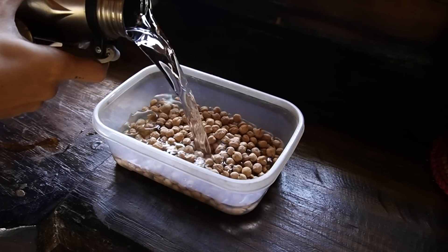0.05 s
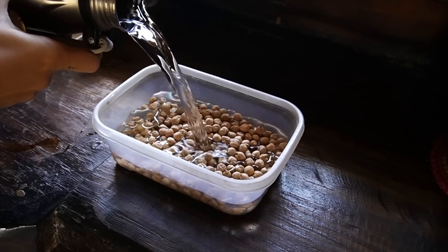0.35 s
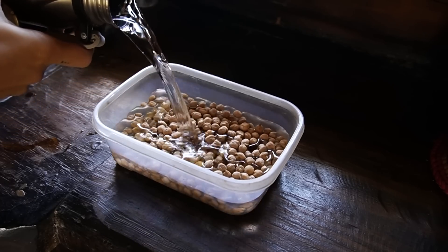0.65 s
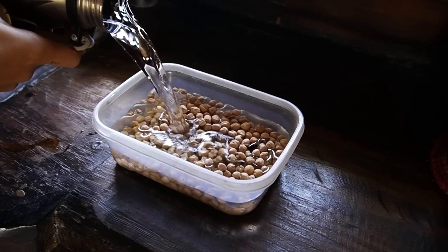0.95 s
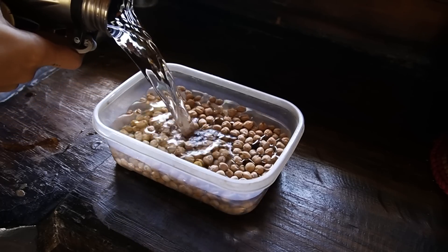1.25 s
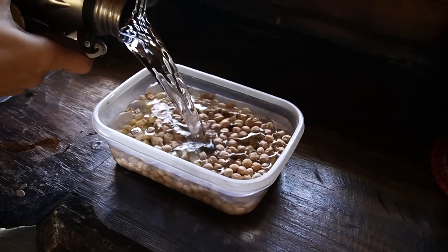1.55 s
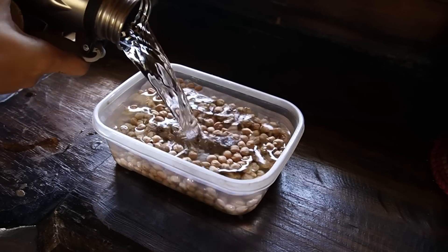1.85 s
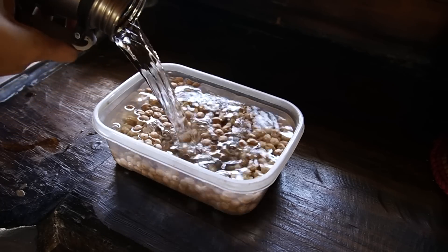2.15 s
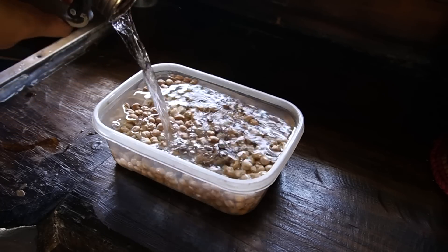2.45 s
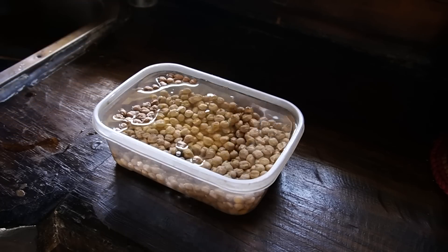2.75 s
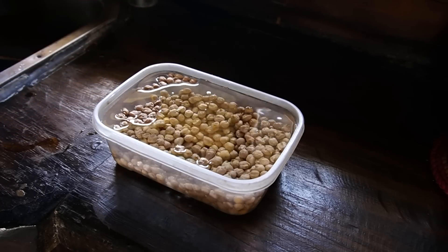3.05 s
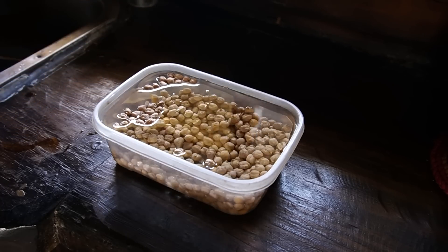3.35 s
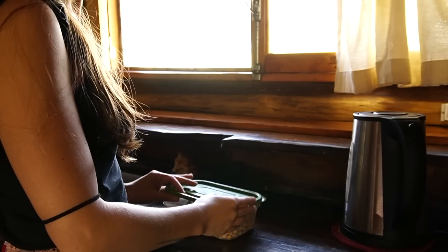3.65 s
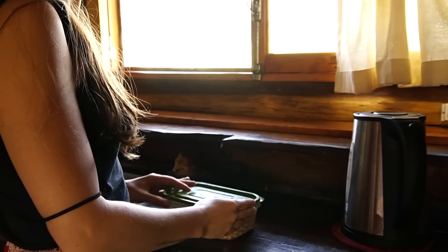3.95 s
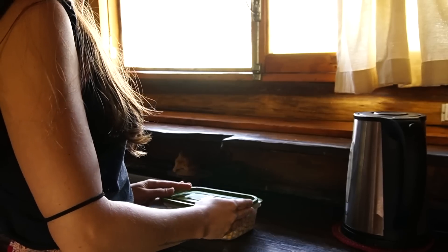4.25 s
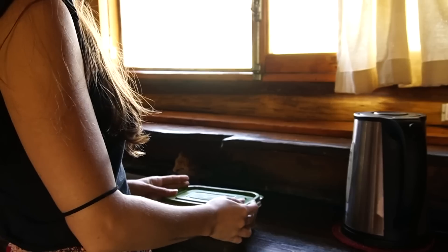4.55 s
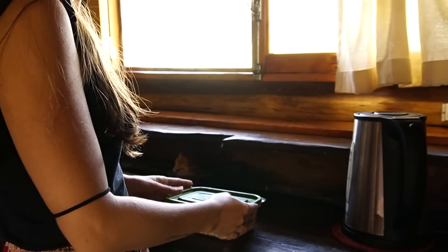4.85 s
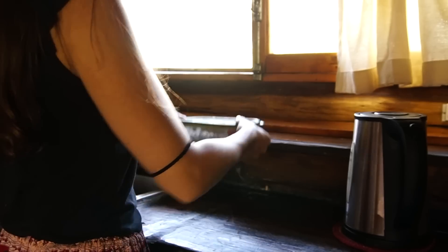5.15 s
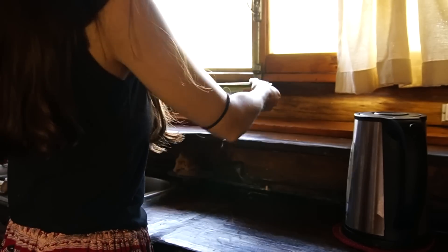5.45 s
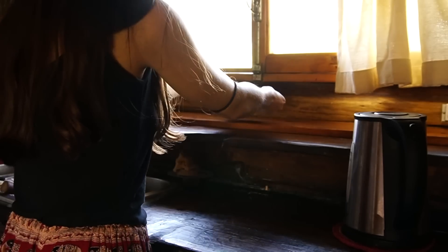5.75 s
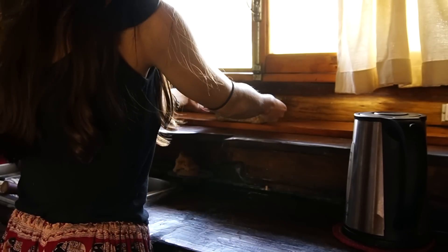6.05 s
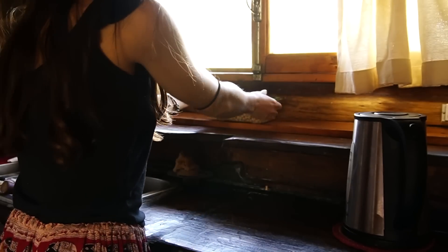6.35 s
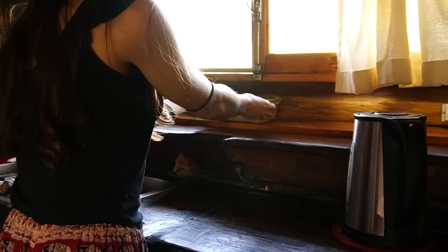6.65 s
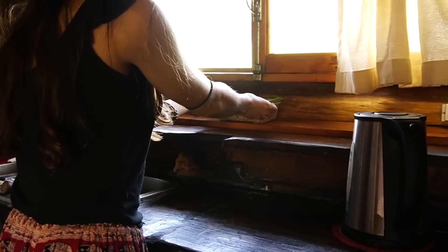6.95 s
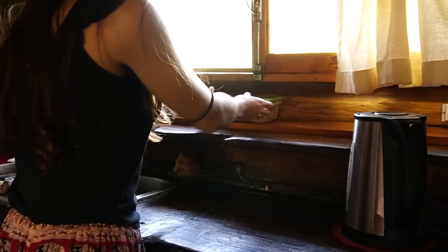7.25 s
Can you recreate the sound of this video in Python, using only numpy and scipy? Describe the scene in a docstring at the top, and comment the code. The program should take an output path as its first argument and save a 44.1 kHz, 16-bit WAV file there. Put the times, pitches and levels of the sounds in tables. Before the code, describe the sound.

In a small wooden kitchen, a stream of water splashes over dried chickpeas in a plastic tub, near and slightly to the right, growing fuller and bubblier before trickling out. A steel flask is set down with a short ringing clatter, then a lid clicks shut three times. Last comes the more distant knock of the tub on a shelf, over a soft fridge hum and faint dripping.

```python
"""Water patters onto dried chickpeas in a plastic tub, close to a pair of microphones, slightly right.
Poured from a steel flask, it swells into a bubbling gurgle as the peas go under, then thins and stops.
The flask is set down with a clank, a lid is pressed on until its edges snap, and the tub knocks onto
a wooden shelf farther off. The place is a small wooden kitchen: after the pour a fridge hums,
and something, perhaps a tap, drips faintly in the distance."""
import sys
import numpy as np
from scipy import signal
from scipy.fft import rfft, irfft
from scipy.io import wavfile
from scipy.ndimage import uniform_filter1d

SR = 44100
rng = np.random.default_rng(int(sys.argv[2]) if len(sys.argv) > 2 else 0)


def bounce(signal):
    """Save signal as a 16-bit WAV file at the path given by the first command-line argument."""
    frames = np.transpose(np.atleast_2d(signal))
    limited = np.clip(frames, -1, 1)
    pcm = np.round(limited * 32767).astype(np.int16)
    wavfile.write(sys.argv[1], SR, pcm)


N = 322363
TIME = np.arange(N) / SR
TAPS, TOP_HZ = 4096, 15850
HZ = np.fft.rfftfreq(TAPS, 1 / SR)
COVER_START_S, COVER_LENGTH_S = 0.8, 0.6  # the water closes over the peas


# splash colour on bare peas, in deep water and as the stream thins: frequency_hz, level_db
ON_PEAS = [(290, -61), (500, -32), (850, -22.5), (1070, -7), (1560, -11), (1850, -6), (2330, -10),
           (4440, -7), (5830, -18), (8480, -27.5), (15500, -58.5)]
IN_WATER = [(240, -53), (400, -18), (466, -34), (683, -19), (1100, -6), (1630, -5.5), (1790, -0.5),
            (2710, -7), (3410, -1), (4420, -4.5), (8150, -23), (11500, -31.5), (15500, -59)]
THINNING = [(500, -61), (666, -17), (941, -4), (1820, -8.5), (2330, -12), (3430, -6.5), (6500, -12.5),
            (9650, -20.5), (15500, -28)]
def stream(tub_hz=1800, tub_width_hz=140, tub_db=-41):
    """Close up, tiny bubbles crackle and make the tub sing; larger ones grow as the peas go under."""
    covered = ramp(COVER_START_S, COVER_LENGTH_S)
    thin = ramp(start_s=2.435, length_s=0.34)  # the flask tips back
    crackle = froth(503, 11560, cycles=0.82, rise=0.029, spread_db=1, clump_db=4, count=9000)
    gurgle = froth(737.6, 3108, cycles=7.1, rise=0.0053, spread_db=3, clump_db=3.5, count=1900)
    chime = froth(1150, 4800, cycles=10, rise=0.003, spread_db=1, clump_db=1.5, count=420)
    swarm = unit_rms(crackle) + gain_of(-5) * (1 + covered) / 2 * unit_rms(gurgle)
    swarm += gain_of(-10) * unit_rms(chime)
    stages = ((1 - covered, ON_PEAS), (covered - thin, IN_WATER), (thin, THINNING))
    splash = sum(share * unit_rms(colour(swarm, curve(tone))) for share, tone in stages)
    tub = signal.lfilter(*signal.iirpeak(tub_hz, tub_hz / tub_width_hz, fs=SR), crackle)
    tub_gain = gain_of(tub_db) * ramp(0, 0.1) * (1 - thin)
    return gain_of(-1.2) * poured(splash, flow()) + poured(tub, tub_gain)


# strength of the stream: time_s, level_db
FLOW = [(0.0, -38.5), (0.17, -32.5), (0.3, -28.5), (0.55, -34.5), (0.92, -30.5), (1.0, -21), (1.19, -18),
        (1.62, -16.5), (1.7, -20), (1.82, -17), (2.07, -19), (2.19, -16), (2.26, -19), (2.3, -22.5),
        (2.43, -27.5), (2.69, -30.5), (2.756, -35)]
POUR_END_S = FLOW[-1][0]
# separate spurts, later surges of the full stream: start_s, length_s, level_db, spray_db
SPURTS = [(0.177, 0.1, -27.5, -38), (0.344, 0.069, -23, -33.5), (0.587, 0.1, -24.5, -59),
          (0.754, 0.13, -22, -49), (1.13, 0.04, -21.5, -25.5), (1.211, 0.022, -23, -28),
          (2.108, 0.033, -17, -37)]
def flow():
    """Gain of the water landing in the tub: it builds in spurts, runs full and thins out."""
    steady = gain_of(np.interp(TIME, *np.transpose(FLOW)))
    spurt_power = sum((gain_of(db) * spurt(s, length_s)) ** 2 for s, length_s, db, _ in SPURTS)
    return np.sqrt(steady ** 2 + spurt_power)


def spray(on_peas_db=-18, in_water_db=-23):
    """Fine spray hisses and sparkles with each spurt; bare peas throw up more than water does."""
    mist = froth(4000, 12600, cycles=3.3, rise=0.018, spread_db=3.5, clump_db=4.5, count=2600)
    pips = froth(5500, 11000, cycles=13, rise=0.012, spread_db=2, clump_db=1.5, count=140)
    hiss = colour(unit_rms(mist) + unit_rms(pips), curve([(2500, -42), (4400, 7.5), (14000, -29)]))
    covered = ramp(COVER_START_S, COVER_LENGTH_S)
    steady = flow() * gain_of(on_peas_db + (in_water_db - on_peas_db) * covered)
    bursts = sum(gain_of(db) * spurt(s, length_s) for s, length_s, _, db in SPURTS)
    return poured(hiss, steady + bursts)


# lumps of water, and single droplets falling back: start_s, level_db, pitch_hz
GULPS = [(0.087, -15.5, 1750), (0.131, -12.5, 1720), (0.18, -11.5, 1770), (0.231, -9.5, 1820),
         (0.347, -11, 4430), (0.367, -7.5, 3130), (0.463, -6.5, 3600), (0.481, -12.5, 3260),
         (0.599, -10.5, 1260), (0.657, -9, 1660), (0.67, -8, 2070), (0.747, -10, 1350), (0.935, -8, 3030),
         (0.969, -8.5, 2430), (0.979, -3, 1850), (1.02, -4.5, 3060), (1.112, -5.5, 3830), (1.229, -4, 4690),
         (1.274, -9, 3100), (1.568, -8, 1840), (1.691, -5, 1960), (1.714, -4.5, 1810), (2.191, -6.5, 3080),
         (2.258, -6, 1940), (2.263, -7, 3370), (2.306, -7, 3620), (2.316, -4, 3550), (2.385, -4.5, 3470),
         (2.457, -11.5, 2020), (2.484, -13, 2000), (2.567, -10, 3360)]
DROPLETS = [(0.4556, -14.5, 8060), (0.598, -17.5, 8800), (0.979, -18, 7900), (1.511, -13.5, 8060),
            (2.452, -27.5, 9100), (2.6217, -20, 9600), (2.6384, -23, 8100), (2.664, -26, 7700),
            (2.692, -28, 7900)]
def gulps_and_droplets(rise=0.0079, peas_slap_s=0.0057, water_slap_s=0.0032):
    """A lump of water slaps down and leaves one large bubble ringing; stray droplets pip high above."""
    out = np.zeros(N)
    slap_colour = curve(ON_PEAS) + 3.9 * np.clip(HZ / 10000, 0, 1)
    for s, db, hz in GULPS:
        slap_s = peas_slap_s + (water_slap_s - peas_slap_s) * ramp(COVER_START_S, COVER_LENGTH_S, s)
        add(out, s, gain_of(db - 8.5) * contact(slap_s, slap_colour, crack=0.61))
        cycles = 7 * np.sqrt(hz / 3000)  # small bubbles ring for more cycles
        add(out, s, gain_of(db - 5) * bubble(hz, cycles, rise))
    for s, db, hz in DROPLETS:
        pip = colour(bubble(hz, cycles=11, rise=rise), -abs(HZ - hz) / 330)
        add(out, s, gain_of(db - 1) * pip)
    return butterworth(out, 5, (820, 13000), "band")


# clear bubble notes, most in the last trickle: start_s, level_db, pitch_hz, decay_s
PLINKS = [(0.632, -21, 1415, 0.013), (0.654, -16, 1600, 0.007), (2.484, -9.5, 1294, 0.0035),
          (2.514, -15, 1950, 0.0056), (2.529, -20, 1030, 0.0039), (2.567, -10.5, 994, 0.0037),
          (2.605, -22, 1380, 0.0045), (2.64, -24, 910, 0.011), (2.709, -23, 2140, 0.0069)]
def plinks():
    """Bubbles ring clearly and glide upwards, some ringing on from a small splash."""
    out = np.zeros(N)
    for s, db, hz, decay_s in PLINKS:
        add(out, s, gain_of(db) * bubble(hz, cycles=decay_s * hz, rise=0.012))
    return butterworth(out, 4, (760, 5000), "band")


# moments when the stream digs deep: middle_s, length_s, level_db
GURGLES = [(1.245, 0.099, -37), (1.876, 0.28, -36)]
def gurgles():
    """Big, low bubbles well up and sink away under the splashing."""
    swarm = froth(611, 814, cycles=7.3, rise=0.0036, spread_db=3.5, clump_db=3.5, count=250)
    swells = sum(gain_of(db) * swell(s, length_s) for s, length_s, db in GURGLES)
    return poured(butterworth(swarm, 3, 550, "high"), swells)


def drumming(drum_db=-52.5, full_flow_db=-18):
    """The stream buffets the floor of the tub, harder as it grows; once there is a dull bump."""
    buffets = rng.standard_normal(N) * gain_of(4 * band_noise(N, 0, 80))
    drum = colour(buffets, curve([(40, -23), (200, 4.5), (450, -4), (800, -22), (2000, -64)]))
    bump = gain_of(-39.5) * swell(middle_s=0.925, length_s=0.071)
    return poured(drum, gain_of(drum_db - full_flow_db) * flow() + bump)


def foam(start_s=2.762, level_db=-37, fade_s=0.13):
    """A soft fizz dies away in the tub when the stream stops."""
    age = TIME - start_s
    tone = curve([(400, -6), (1200, -6), (2900, 5.5), (8000, -4.5), (15000, -18)])
    fizz = unit_rms(colour(rng.standard_normal(N), tone))
    return gain_of(level_db) * fizz * (age > 0) * np.exp(-abs(age) / fade_s)


# the flask landing: start_s, level_db, decay_s, tilt_db_per_octave, lowest_hz, spot_hz, thud_db
FLASK_BLOWS = [(2.949, -26.5, 0.01, 2.5, 1200, 1640, -5), (2.977, -15, 0.0066, -4.5, 152, 534, -3),
               (2.994, -15, 0.0044, 1.5, 1090, 2080, -27), (3.000, -9.5, 0.0024, 2, 910, 2150, -36),
               (3.085, -21, 0.011, -1.5, 170, 5060, 0), (3.1145, -16, 0.0078, -1, 200, 1900, -3),
               (3.119, -18.5, 0.0089, 2, 200, 410, -4)]
# colour of its contact: frequency_hz, level_db
FLASK_COLOUR = [(88, -57), (150, -24), (787, -12), (1200, -1), (1350, -8.5), (2100, -9), (3400, -19.5),
                (4810, -12.5), (8750, -29), (9600, -25.5), (15000, -56)]
# modes of the steel: pitch_hz, level_db, t60_s
FLASK_MODES = [(1192, 4, 0.15), (1583, 7, 0.067), (1660, 3, 0.16), (2056, 11, 0.09), (2140, -4, 0.22),
               (3040, -5, 0.23), (4840, -11, 0.22)]
def flask_set_down():
    """The steel flask clatters and rings on wood, near the microphones."""
    return knocks(FLASK_BLOWS, FLASK_COLOUR, FLASK_MODES, contact_db=-3.5, ring_db=-21,
                  thud_hz=215, thud_t60_s=0.04, crack=3.2)


# edges catching: start_s, level_db, decay_s, tilt_db_per_octave, lowest_hz, spot_hz, thud_db
LID_BLOWS = [(3.6865, -5, 0.0027, 0, 900, 1030, -27.5), (3.699, -16, 0.014, -0.5, 900, 990, -35),
             (3.737, -27, 0.0074, -2, 240, 1010, -28), (4.200, -7, 0.0061, 0, 253, 2490, -12),
             (4.209, -16.5, 0.013, -5.5, 595, 1420, -13), (4.723, -16.5, 0.028, -1.5, 724, 840, -41),
             (4.732, -13, 0.01, -2.5, 710, 2330, -35), (4.745, -6, 0.0038, 0, 258, 3780, -19.5)]
# colour of a snap: frequency_hz, level_db
LID_COLOUR = [(88, -47), (150, 1), (450, -6), (742, -0.5), (1870, -5.5), (2600, -4.5), (3900, -4.5),
              (6060, -13.5), (10000, -29), (15000, -50)]
# modes of the lid and tub: pitch_hz, level_db, t60_s
LID_MODES = [(706, 5.5, 0.054), (835, 2.5, 0.096), (1400, -5, 0.12), (1712, -12, 0.1), (2300, -8, 0.067),
             (3400, 1, 0.091)]
def lid_snaps():
    """Close by, the plastic lid snaps over the rim in three presses."""
    return knocks(LID_BLOWS, LID_COLOUR, LID_MODES, contact_db=-6, ring_db=-23,
                  thud_hz=156.5, thud_t60_s=0.098, crack=5)


# fingers and plastic rubbing on the tub: middle_s, level_db, length_s, hollow_db
RUBS = [(3.917, -42, 0.088, -11), (3.953, -37.5, 0.02, -24), (4.19, -37.5, 0.049, -6.5),
        (4.46, -39, 0.074, -4), (4.521, -41, 0.057, -0.5), (4.57, -37, 0.033, 3), (4.72, -37, 0.097, -3.5),
        (6.274, -46.5, 0.079, -7), (7.173, -49.5, 0.037, 5.5)]
def rubs():
    """Small slips of skin and plastic scrape and wake the hollow of the tub."""
    out, size = np.zeros(N), SR // 4
    half_s = size / SR / 2
    tone = curve([(80, -24), (150, 7), (600, -11), (1500, 2), (4000, 0.5), (7000, -7), (15000, -33)])
    for s, db, length_s, hollow_db in RUBS:
        slips = rng.standard_normal(size) * gain_of(4 * band_noise(size, 0, 500))
        scrape = unit_rms(colour(slips, tone))
        hollow = gain_of(hollow_db) * band_noise(size, hz=790, width_hz=290)
        stroke = swell(half_s, length_s)[:size]
        add(out, s - half_s, gain_of(db) * stroke * (scrape + hollow))
    return out


# the tub landing: start_s, level_db, decay_s, tilt_db_per_octave, lowest_hz, spot_hz, thud_db
SHELF_BLOWS = [(5.924, -7, 0.0015, -3.5, 330, 2700, -25), (5.926, -12, 0.0068, -7.5, 300, 410, -17),
               (5.937, -13.5, 0.0085, -3, 330, 480, -21), (5.961, -9.5, 0.0012, -4, 300, 2600, -15),
               (5.964, -16, 0.017, -4, 332, 445, -14)]
# colour of plastic on wood: frequency_hz, level_db
SHELF_COLOUR = [(71, -57), (120, -5.5), (374, -14.5), (445, -9.5), (693, -7), (1200, -8.5), (2400, -7.5),
                (3180, -4.5), (12000, -39.5), (15600, -80)]
# modes of the tub and shelf: pitch_hz, level_db, t60_s
SHELF_MODES = [(393, -7, 0.079), (455, -10, 0.1), (593, -5, 0.23), (732, -6, 0.14), (1166, -6, 0.26)]
def tub_on_shelf():
    """Farther from the microphones, the filled tub knocks onto a wooden shelf."""
    return knocks(SHELF_BLOWS, SHELF_COLOUR, SHELF_MODES, contact_db=-7, ring_db=-28.5,
                  thud_hz=176, thud_t60_s=0.065, crack=0.87, spot_octaves=0.29)


# drips on a nearly even beat, with two gaps: start_s, level_db
DRIPS = [(4.924, -43), (5.19, -41), (5.453, -44.5), (5.719, -40), (6.253, -41), (6.78, -42.5),
         (7.044, -43.5)]
# colour of a drip: frequency_hz, level_db
DRIP_COLOUR = [(1500, -21), (3600, 0), (4600, -6), (5200, 1), (6300, -11), (15000, -26)]
def drips(rise_s=0.007, fade_s=0.017):
    """Soft ticks across the kitchen, each smeared into a short spatter."""
    out, t = np.zeros(N), TIME[:TAPS]
    envelope = 2 * (1 - np.exp(-t / rise_s)) * np.exp(-t / fade_s)
    for s, db in DRIPS:
        spatter = unit_rms(colour(rng.standard_normal(TAPS), curve(DRIP_COLOUR)))
        add(out, s - rise_s, gain_of(db) * spatter * envelope)
    return out


# colour of the room tone: frequency_hz, level_db
ROOM_TONE = [(15, -28), (25, -15), (107, -9.5), (140, -7), (313, -10.5), (380, -8.5), (684, -11.5),
             (1200, -11), (1900, -14), (3830, -15.5), (15500, -32.5)]
# bands of the fridge hum: pitch_hz, width_hz, level_db
FRIDGE_HUM = [(44, 10, -66.5), (132.3, 20, -60.5), (202, 18, -64), (1240, 49, -62)]
def fridge_and_air(fridge_on_s=3.2, air_db=-46.5, bass_while_off_db=-8):
    """Steady air all around the microphones, joined by the wavering hum and rumble of the fridge."""
    running = ramp(fridge_on_s, 0.021)
    mid, side = (unit_rms(colour(rng.standard_normal(N), curve(ROOM_TONE))) for _ in range(2))
    air = microphone_pair(mid, side)
    bass = butterworth(air, 1, 120, "low")
    air -= bass * (1 - running) * (1 - gain_of(bass_while_off_db))
    hum = sum(gain_of(db) * band_noise(N, hz, width_hz) for hz, width_hz, db in FRIDGE_HUM)
    return gain_of(air_db) * air + running * hum


# reverberation of the kitchen: frequency_hz, t60_s
KITCHEN_DECAY = [(120, 0.36), (320, 0.21), (840, 0.32), (2200, 0.28), (5800, 0.32), (14000, 0.52)]
def kitchen(direct, wet_db, delay_s=0.0044):
    """The direct sound, then reflections off close wooden walls, each band dying at its own speed."""
    size = SR // 2
    echoes = rng.standard_normal((2, size)) * (rng.random((2, size)) < .08) * (TIME[:size] > delay_s)
    hz, t, bands = signal.stft(echoes, SR, nperseg=256)
    tails = signal.istft(bands * decay(t, curve(KITCHEN_DECAY, hz)[:, None]), SR, nperseg=256)[1]
    tails = microphone_pair(*(tails / np.linalg.norm(tails, axis=1, keepdims=True)))
    return direct + gain_of(wet_db) * signal.oaconvolve(direct[None], tails, axes=1)[:, :N]


# stereo width of diffuse sound: frequency_hz, side_db
STEREO_WIDTH = [(60, -16), (250, -6.5), (900, -10), (2500, -6), (5000, -2), (9000, -0.5), (13000, -1)]
def microphone_pair(mid, side):
    """Two closely spaced microphones hear bass alike and treble differently."""
    side = colour(side, curve(STEREO_WIDTH))
    return np.array([mid + side, mid - side])


def bubble(hz, cycles, rise):
    """A trapped bubble rings, dies, and rises in pitch as it nears the surface."""
    age = np.arange(int(5 * cycles / hz * SR) + 2) * hz / (SR * cycles)  # in decay times
    return np.exp(-age) * np.sin(2 * np.pi * cycles * age * (1 + rise * age))


def froth(low_hz, high_hz, cycles, rise, spread_db, clump_db, count):
    """A clumped swarm of bubbles of many sizes, scattered over the whole pour."""
    out, clumps = np.zeros(N), band_noise(N, 0, 67)
    when, pitch, life, size, sign = rng.random((count, 5)).T
    starts_s = when * POUR_END_S
    pitches_hz = np.minimum(low_hz * (high_hz / low_hz) ** pitch, TOP_HZ)
    ring_cycles = cycles * 4 ** (life - .5)
    size_db = spread_db * np.minimum(-np.log(1 - size), 3.5)
    size_db += clump_db * np.interp(starts_s, TIME, clumps)
    heights = np.sign(sign - .5) * gain_of(size_db) * pitches_hz / np.sqrt(ring_cycles)
    for s, hz, ring, height in zip(starts_s, pitches_hz, ring_cycles, heights):
        add(out, s, height * bubble(hz, ring, rise))
    return out


def poured(x, gain):
    """Levels a sound, makes it follow a gain, and stops it with the stream."""
    power = uniform_filter1d(uniform_filter1d(x ** 2, size=2000), size=1400)
    stop = np.clip((POUR_END_S - TIME) / 0.011 + 1, 0, 1)
    return x / np.sqrt(abs(power) + 1e-4 * power.max()) * gain * stop


def knocks(blows, body, modes, contact_db, ring_db, thud_hz, thud_t60_s, crack, spot_octaves=0.19):
    """Each blow is a clatter of contact, the ringing of the thing, and a thud of the wood below."""
    out, t = np.zeros(N), TIME[:SR // 2]
    thud = decay(t, thud_t60_s) * np.sin(2 * np.pi * thud_hz * t) * (1 - np.exp(-t * thud_hz))
    for s, db, decay_s, tilt, lowest_hz, spot_hz, thud_db in blows:
        # a blow on a stiff edge leaves the low modes still, and each spot has its own note
        stiff_db = -10 * np.log10(1 + (lowest_hz / (HZ + 1)) ** 8)
        slope_db = tilt * np.log2(np.clip(HZ, 300, 9000) / 1500) + stiff_db
        spot_db = 7 * np.exp(-(np.log2((HZ + 1) / spot_hz) / spot_octaves) ** 2)
        ring = np.zeros(len(t))
        for hz, mode_db, t60_s in modes:
            shifted_hz = hz * (1 + 0.0087 * rng.normal())  # each note shifts a little from blow to blow
            note = np.sin(2 * np.pi * (shifted_hz * t + rng.random()))
            ring += gain_of(mode_db + np.interp(hz, HZ, slope_db)) * decay(t, t60_s) * note
        clatter = contact(decay_s, curve(body) + slope_db + spot_db, crack)
        add(out, s, gain_of(db + contact_db) * clatter)
        add(out, s, gain_of(db) * (gain_of(ring_db) * ring + gain_of(thud_db) * thud))
    return out


def contact(decay_s, colour_db, crack):
    """A sharp first touch of height crack, with a brief clatter of noise behind it."""
    burst = rng.standard_normal(TAPS) * np.exp(-TIME[:TAPS] / decay_s)
    burst[0] = crack
    burst = colour(burst, colour_db)
    return burst * np.sqrt(decay_s * SR / 2 / np.sum(burst ** 2))


def spurt(start_s, length_s, rise_s=0.0021, fade_s=0.0039):
    """Rises quickly, holds, and dies away."""
    return ramp(start_s, rise_s) * np.exp(-np.maximum(TIME - start_s - length_s, 0) / fade_s)


def swell(middle_s, length_s):
    """A smooth rise and fall."""
    return np.exp(-(2 * (TIME - middle_s) / length_s) ** 2)


def ramp(start_s, length_s, t=TIME):
    """Rises from 0 to 1 in a straight line."""
    return np.clip((t - start_s) / length_s, 0, 1)


def decay(t, t60_s):
    """Falls by 60 dB in t60_s."""
    return np.exp(-np.log(1000) * t / t60_s)


def band_noise(size, hz, width_hz):
    """Noise in one resonance, rms 1; at 0 Hz, a random flutter."""
    f = np.fft.rfftfreq(size, 1 / SR)
    return unit_rms(irfft(rfft(rng.standard_normal(size)) / (1 + (2 * (f - hz) / width_hz) ** 2), size))


def colour(x, db):
    """Minimum-phase filter with the gain db at the frequencies HZ."""
    cepstrum = irfft(np.log(gain_of(np.maximum(db, -100))))
    cepstrum[1:TAPS // 2] *= 2
    cepstrum[TAPS // 2 + 1:] = 0
    return signal.oaconvolve(x, irfft(np.exp(rfft(cepstrum))))[:len(x)]


def butterworth(x, order, hz, kind):
    """Low, high or band pass."""
    return signal.sosfilt(signal.butter(order, hz, kind, fs=SR, output="sos"), x)


def curve(points, hz=HZ):
    """Joins a table by straight lines on a log-frequency axis."""
    f, value = np.transpose(points)
    return np.interp(np.log(hz + 1), np.log(f + 1), value)


def gain_of(db):
    """Decibels to gain."""
    return 10 ** (np.asarray(db) / 20)


def unit_rms(x):
    """Scales to an rms of 1."""
    return x / np.sqrt(np.mean(x ** 2) + 1e-20)


def add(mix, start_s, sound):
    """Mixes a sound in at start_s."""
    part = mix[max(round(start_s * SR), 0):][:len(sound)]
    part += sound[:len(part)]


def scene():
    """Pour, flask and lid sit a little right of the microphones; shelf, drips and foam are centred."""
    flask, lid, shelf = flask_set_down(), lid_snaps(), tub_on_shelf()
    pour = stream() + spray() + drumming() + gurgles() + gulps_and_droplets() + plinks()
    near = kitchen(pour, wet_db=-9.5) + kitchen(flask, wet_db=-1) + kitchen(lid + rubs(), wet_db=-4.5)
    centre = kitchen(shelf, wet_db=-2.5) + kitchen(drips() + foam(), wet_db=-7.5)
    return near * gain_of([[-.35], [.35]]) + centre + fridge_and_air()


def record(dry, ceiling=0.8):
    """Behind the microphones: a low cut for rumble, rounded peaks and a steep treble limit."""
    dry = butterworth(dry, 4, 36, "high")
    rounded = dry / (1 + (dry / ceiling) ** 4) ** (1 / 4)
    lowpass = signal.firwin(511, TOP_HZ, window=("kaiser", 9), fs=SR)
    return signal.oaconvolve(rounded, lowpass[None], "same")


dry = scene()
out = record(dry)
bounce(out)
```